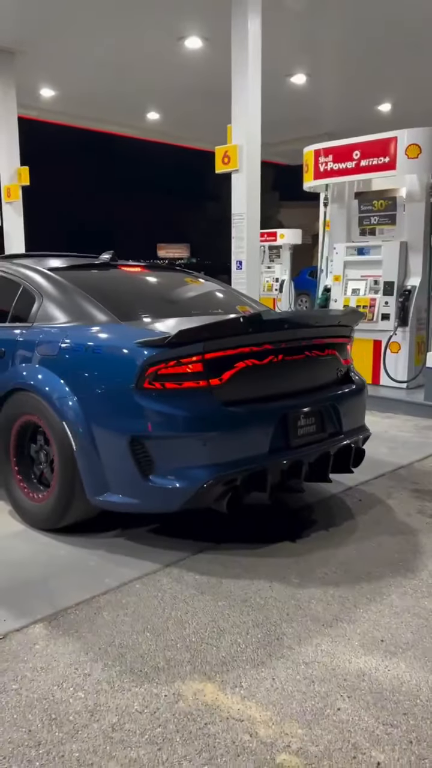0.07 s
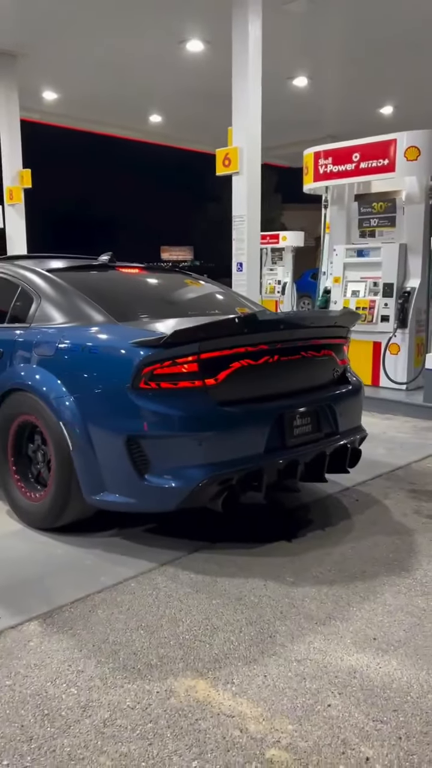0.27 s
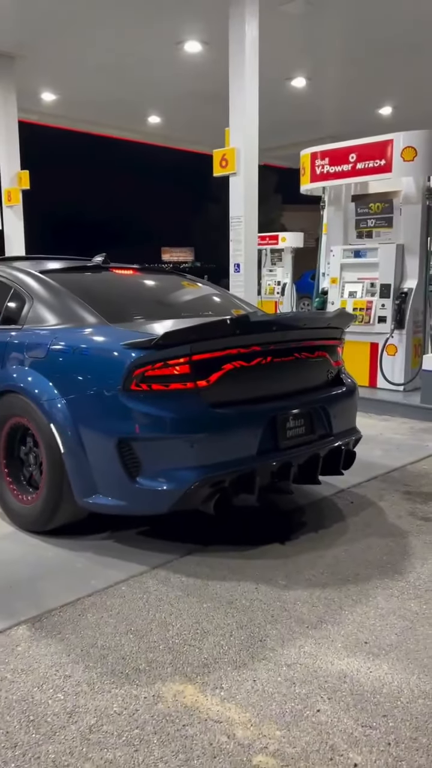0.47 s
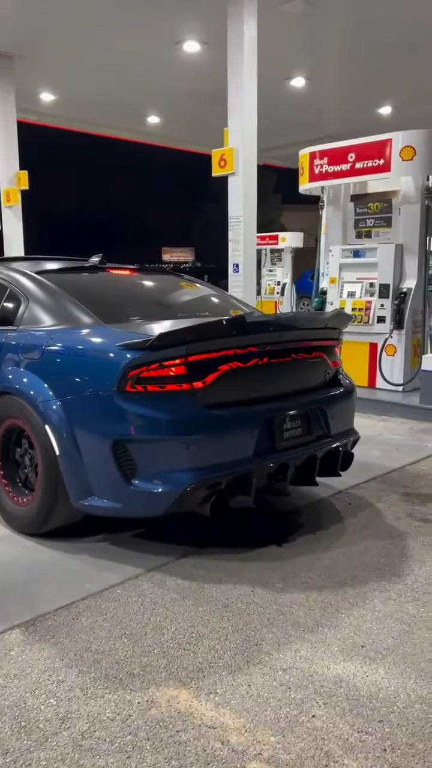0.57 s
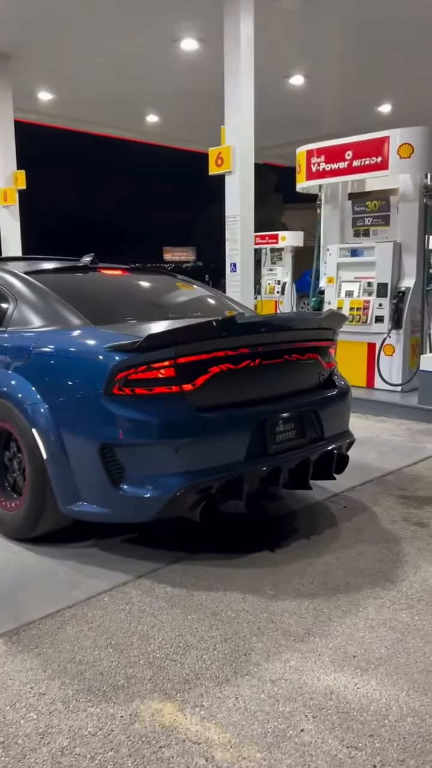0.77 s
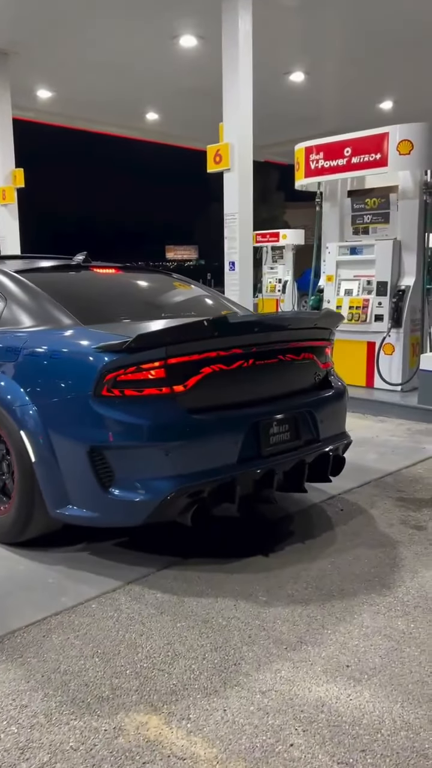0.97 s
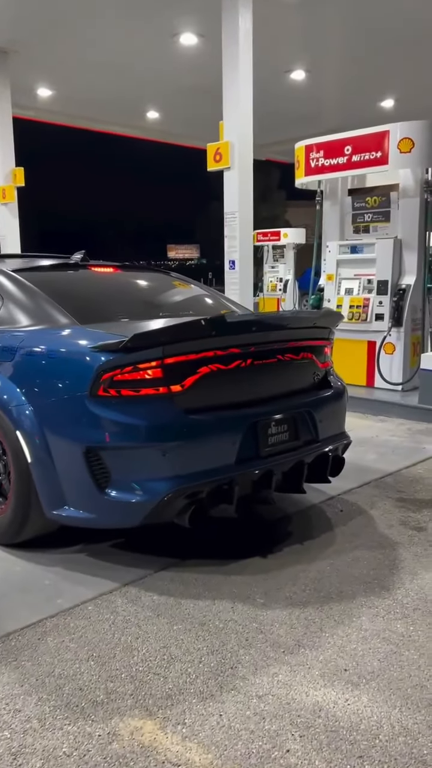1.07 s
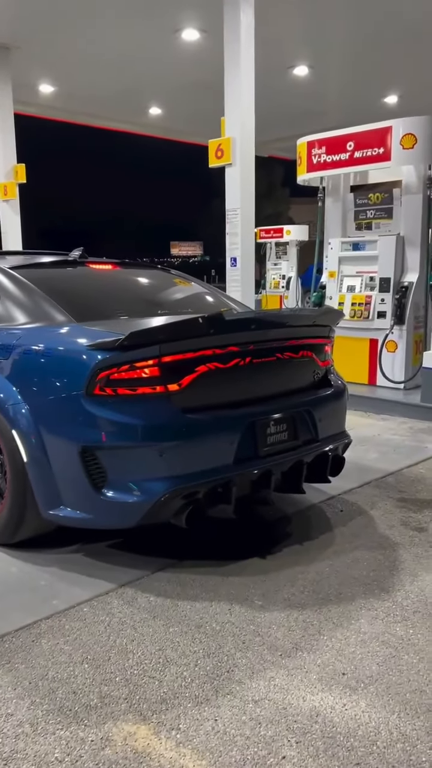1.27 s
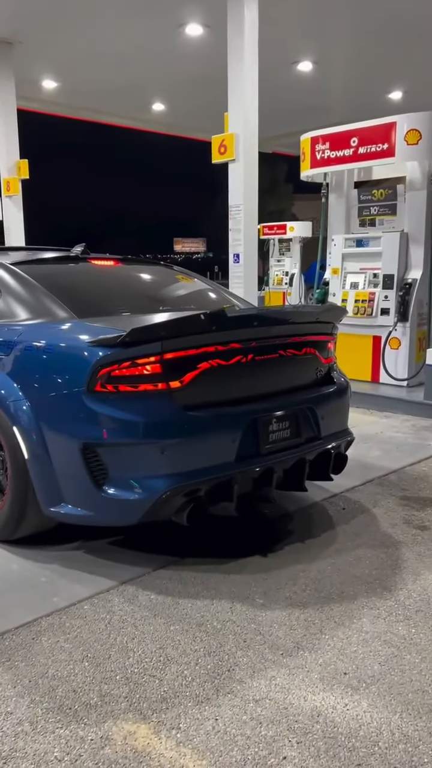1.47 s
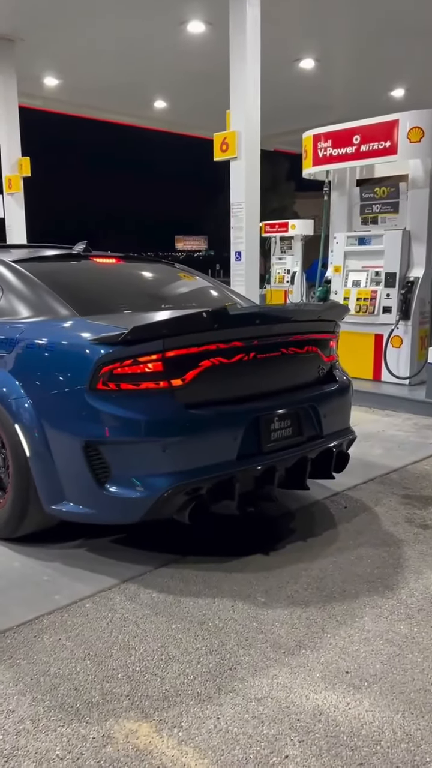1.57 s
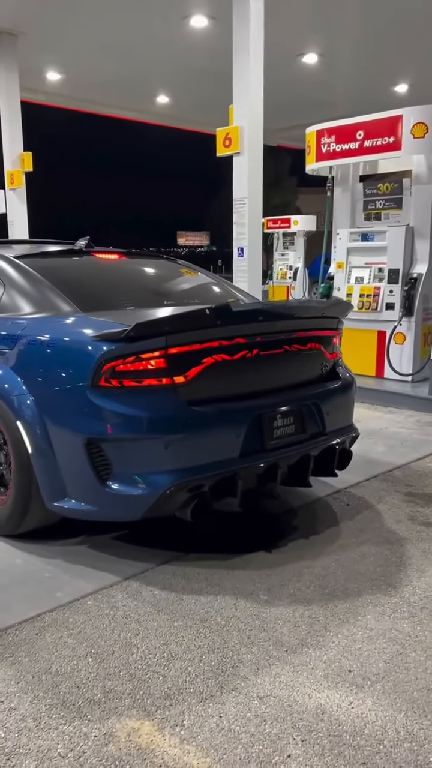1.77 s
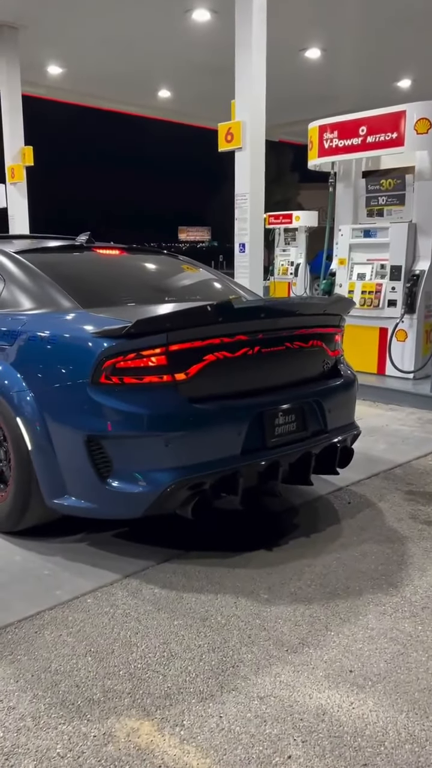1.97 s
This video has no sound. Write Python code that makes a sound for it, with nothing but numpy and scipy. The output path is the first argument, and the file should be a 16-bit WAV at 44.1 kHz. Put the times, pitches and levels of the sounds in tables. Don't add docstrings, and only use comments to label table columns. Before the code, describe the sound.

A V8 car start heard close behind the tailpipe: starter clunks and whines in straining pulses, cylinders bang, the exhaust flares with harsh rasp and crackle, then eases to a lumpy idle under an echoing forecourt roof.

```python
import sys
import numpy as np
from scipy import signal
from scipy.fft import rfft, irfft, next_fast_len
from scipy.io import wavfile
from scipy.ndimage import uniform_filter1d, minimum_filter1d

SR = 44100
rng = np.random.default_rng(int(sys.argv[2]) if len(sys.argv) > 2 else 0)


def waveform_to_disk(signal):
    frames = np.transpose(np.atleast_2d(signal))
    scaled = np.clip(frames, -1, 1) * 32767
    samples = np.round(scaled).astype(np.int16)
    wavfile.write(sys.argv[1], SR, samples)


def voltage_ratio(decibels):
    exponent = np.asarray(decibels, float) / 20
    return 10 ** exponent


N = 88640
T = np.arange(N) / SR
IDLE_FROM_S = 1.43

# (pitch [Hz], level [dB])
JET = [(2500, 7.5), (4000, -5), (6500, -2), (9500, -5.5), (10800, -5), (11600, 4)]
# (pitch [Hz], level [dB per Hz])
GRIND = [(180, -44), (300, -34), (496, -23), (773, -3), (1300, 3), (2580, -16), (3390, -2.5), (9290, -10),
         (11500, -23), (15000, -71), (22000, -120)]
# (pitch [Hz], level [dB per Hz])
NIGHT = [(15, -44), (25, -2), (93, 7), (931, -7.5), (1230, -3.5), (2060, -9.5), (3630, -27.5),
         (9610, -24.5), (11500, -84), (15000, -112), (22000, -120)]


def evened(x):
    return x / np.sqrt(np.mean(x ** 2) + 1e-20)


def shaped(x, points, scale=1):
    f, db = np.transpose(points)
    size = next_fast_len(N + SR // 4)
    hz = np.fft.rfftfreq(size, 1 / SR)
    gain = voltage_ratio(scale * np.interp(np.log(hz + 1), np.log(f + 1), db))
    return irfft(rfft(x, size) * gain, size)[..., :N]


def noise(points):
    below = (points[0][0] / 2, -60)
    above = (points[-1][0] + 400, -90)
    return evened(shaped(rng.standard_normal(N), [below] + list(points) + [above]))


def resonate(x, hz, width):
    turn = np.exp(2j * np.pi * np.cumsum(hz * np.ones(N)) / SR)
    r = np.exp(-np.pi * abs(width) / SR)
    return 2 * (turn * signal.lfilter([1 - r], [1, -r], x / turn)).real


def ring_twice(x, hz, width, widen):
    return evened(resonate(resonate(x, hz, width), hz, widen * width))


def rings(x, table):
    return sum(voltage_ratio(db) * evened(resonate(x, hz, width)) for hz, width, db in table)


def burst(start, rise, hold, t60):
    u = T - start
    return np.clip(u / rise, 0, 1) * voltage_ratio(-60 * np.clip(u - hold, 0, 5 * t60) / t60)


def thump(start, db, hz, t60):
    return voltage_ratio(db) * burst(start, .5 / hz, .5 / hz, t60) * np.sin(2 * np.pi * hz * (T - start))


def patchy(x, depth_db):
    z = signal.stft(x, nperseg=256, noverlap=192)[2]
    field = uniform_filter1d(rng.standard_normal(z.shape), size=7, axis=0)
    field = evened(uniform_filter1d(field, size=18, axis=1))
    return evened(signal.istft(z * voltage_ratio(depth_db * field), nperseg=256, noverlap=192)[1][:N])


def engine():
    # (time [s], firings per second [Hz], firing tone [dB], pipe growl [dB], throttle effort [dB])
    run = [(.895, 63.8, -32, -30, -23.5), (.922, 66.48, -15.5, -22, -58), (.952, 64.1, -5.5, -25, -50),
           (.968, 47.71, -25, -24.5, -36), (.99, 60.09, -17, -13.5, -23.5), (1.04, 61.6, -12, -19, -21.5),
           (1.065, 67.97, -5.5, -23.5, -20.5), (1.09, 74.84, -14, -15.5, -18.5),
           (1.14, 87.36, -10.5, -16.5, -22), (1.2, 97.54, -8, -13.5, -18.5),
           (1.27, 106.6, -8.5, -16.5, -21.5), (1.33, 108.3, -10.5, -14.5, -20.5),
           (1.45, 109.6, -11.5, -13, -26.5), (1.56, 110.5, -15, -19, -33), (1.66, 109.7, -18, -23.5, -42),
           (1.76, 108.3, -49, -22.5, -41), (1.88, 106.6, -18, -28.5, -37), (2.01, 103.9, -18.5, -22, -38)]
    columns = np.transpose(run)
    rate, tone_db, growl_db, effort_db = (np.interp(T, columns[0], c) for c in columns[1:])
    start = run[0][0]
    on = np.clip((T - start) / 0.013 + 1, 0, 1)
    turns = np.cumsum(rate * (T > start)) / SR + 0.2194
    wobble = .05 * np.interp(turns, np.arange(200), rng.standard_normal(200))
    out = firing_tone(turns, rate, tone_db)
    out += pipe_growl(turns + wobble, growl_db)
    out += rasp_and_jet(turns + wobble, rate, effort_db, on)
    return on * out + idle_lumps()


def firing_tone(turns, rate, tone_db):
    # (pitch [Hz], gain [dB])
    overtone_gain = [(120, -7), (190, -8.5), (225, -17.5), (330, -13.5)]
    out = np.sqrt(2) * voltage_ratio(tone_db) * np.cos(2 * np.pi * turns)
    for k in range(2, 4):
        gain_db = np.interp(k * rate, *np.transpose(overtone_gain))
        out += voltage_ratio(tone_db + gain_db) * np.cos(2 * np.pi * k * turns - 0.49 * k)
    return out


def pipe_growl(uneven_turns, growl_db):
    # (pitch [Hz], width [Hz], level [dB])
    pipe_modes = [(227, 36, -6), (252.6, 22, -10.5), (310.5, 26, -0.5), (340.6, 23, 0), (397, 15, -7),
                  (442.5, 17.5, -10)]
    # (pitch [Hz], width [Hz], level [dB])
    low_modes = [(59.9, 6.2, -35), (85, 22, -27.5), (141.3, 9.4, -28), (201, 28, -53)]
    firing = np.maximum.accumulate((uneven_turns + 1).astype(int))
    strength = 1 + np.clip(rng.standard_normal(200), -1.5, 1.5)[firing]
    kicks = evened(np.diff(firing, prepend=firing[0]) * strength)
    kicks = kicks + .5 * rng.standard_normal(N)

    growl = sum(voltage_ratio(db) * ring_twice(kicks, hz, w, 3) for hz, w, db in pipe_modes)
    steady = np.sqrt(uniform_filter1d(growl ** 2, size=2200) + 1e-4)
    low = sum(voltage_ratio(db) * ring_twice(kicks, hz, w, 3) for hz, w, db in low_modes)
    lope = voltage_ratio(7 * np.clip((T - IDLE_FROM_S) / 0.67, 0, 1))
    idle_hiss = voltage_ratio(-40) * evened(resonate(rng.standard_normal(N), 802, 120))
    return voltage_ratio(growl_db) * growl / steady + lope * low + idle_hiss


def rasp_and_jet(uneven_turns, rate, effort_db, on):
    # (pitch [Hz], level [dB per Hz])
    rasp_colour = [(290, -25), (500, 14), (713, -15), (823, -1.5), (1590, 6.5), (4240, -19), (9320, -38),
                   (10600, -57), (11500, -69), (15000, -74), (22000, -120)]
    grain_s, spread_db, bed, spit_width_hz = .003, 1.8, .55, 380
    late = uneven_turns + .55
    index = late.astype(int)
    size_db = np.clip(rng.standard_normal(200), -2, 1.6)[index]
    pitch = rng.random(200)[index]

    grains = np.exp(-(late % 1) / rate / grain_s) * voltage_ratio(spread_db * size_db) * on
    idle_bed = 0.89 * np.clip((T - IDLE_FROM_S) / 0.093, 0, 1)
    gate = evened(evened(grains) + bed + idle_bed)
    rasp = gate * noise(rasp_colour)

    snap = evened(np.maximum(np.diff(gate, prepend=0), 0))
    spit_hz = 972 * 2 ** (pitch ** 2)
    spit = ring_twice(gate * rng.standard_normal(N) + .9 * snap, spit_hz, spit_width_hz, 2)

    full_effort_db = -20
    jet_db = -29 + 0.95 * (effort_db - full_effort_db)
    jet = voltage_ratio(jet_db) * evened(gate + 5.7) * patchy(noise(JET), 3.5)
    return voltage_ratio(effort_db) * (voltage_ratio(-3) * rasp + voltage_ratio(-6.5) * spit) + jet


def idle_lumps():
    # (time [s], level [dB], pitch [Hz])
    lumps = [
        (1.738, -11, 92),
        (1.774, -10, 113.4),
        (1.804, -6.5, 102),
        (1.845, -15, 84.7),
        (1.914, -7, 158),
        (1.958, -20, 107.9),
        (1.989, -14.5, 134),
    ]
    return sum(thump(s, db, hz, 0.065) for s, db, hz in lumps)


def bangs():
    # (time [s], crack level [dB], crack pitch [Hz], hiss level [dB], length [s])
    bang_list = [(0.897, -19, 1710, -25.5, 0.014), (0.925, -20, 900, -20.5, 0.012),
                 (0.926, -18, 1080, -43, 0.0059), (0.926, -21, 1620, -50, .012),
                 (0.927, -24, 2960, -46, 0.016), (0.979, -14.5, 1754, -20, 0.0089),
                 (0.989, -17.5, 1280, -51, 0.011), (1.069, -25, 1130, -49, 0.0355),
                 (1.135, -24, 1250, -32, 0.047), (1.246, -29, 1290, -35, 0.01),
                 (1.608, -33, 2400, -63, 0.0067), (1.907, -35, 850, -39, 0.03),
                 (1.979, -32, 980, -40.5, 0.017)]
    white = rng.standard_normal(N)
    hiss = noise(JET) + 0.43 * noise(GRIND)
    out = np.zeros(N)
    for s, db, hz, hiss_db, length in bang_list:
        crack = resonate(resonate(white, hz, 0.4 * hz), hz, 0.38 * hz)
        crack = evened(resonate(crack, hz, 0.64 * hz))
        crack = crack / np.sqrt(uniform_filter1d(crack ** 2, size=300) + .05)
        out += burst(s, .001, length, .035) * voltage_ratio(db) * crack
        out += burst(s, 0.0077, length, 0.084) * voltage_ratio(hiss_db) * hiss
    return out


def snaps():
    # (time [s], peak level [dB], pitch [Hz])
    pings = [(1.014, -11, 1830), (1.029, -7, 1360), (1.043, -8.5, 1560), (1.066, -13.5, 1180),
             (1.073, -7, 1140), (1.085, -2.5, 1365), (1.092, -14, 1290), (1.107, -15, 1010),
             (1.121, -6, 840), (1.132, -1.5, 973), (1.143, -5, 1160), (1.159, -11, 1180),
             (1.175, -17, 1270), (1.187, -12, 1570), (1.214, -9, 1210), (1.226, -6.5, 1154),
             (1.245, -4, 1250), (1.251, -12, 1130), (1.283, -15.5, 2070), (1.292, -4.5, 1510),
             (1.3, -7.5, 1047), (1.312, -14, 1580), (1.317, -18, 1600), (1.348, -12, 1570),
             (1.366, -11, 980), (1.375, -7.5, 1480), (1.393, -7.5, 1210), (1.403, -16, 1580),
             (1.41, -18, 1176), (1.43, -14.5, 802), (1.44, -17, 1270), (1.447, -7, 1110),
             (1.466, -17, 1300), (1.476, -15, 1600), (1.511, -12.5, 1126), (1.581, -22, 1180),
             (1.591, -16, 1230), (1.612, -20, 1140), (1.989, -22, 850)]
    t60, rise_s = .017, .0012
    t = np.arange(SR // 20) / SR
    out = np.zeros(N + SR)
    for s, db, hz in pings:
        ping = voltage_ratio(-60 * t / t60) * np.sin(2 * np.pi * hz * t)
        edge = voltage_ratio(-4 - 120 * t / t60) * np.sin(2 * np.pi * 1.75 * hz * t)
        rise = np.minimum(t / rise_s, 1) ** 2
        out[round(s * SR):][:len(t)] += voltage_ratio(db + 1.5) * (ping + edge) * rise
    return out[:N]


def gusts():
    # (time [s], length [s], level [dB], pitch [Hz])
    gust_list = [
        (0.995, 0.026, -31.5, 8900),
        (1.04, .015, -42, 6540),
        (1.074, 0.066, -32.5, 8930),
        (1.176, 0.015, -30, 8900),
        (1.18, 0.028, -41, 5860),
        (1.272, 0.015, -42, 8600),
        (1.316, .04, -35.5, 6750),
        (1.348, 0.0056, -41, 9000),
        (1.416, 0.032, -48, 6350),
    ]
    white = rng.standard_normal(N)
    out = np.zeros(N)
    for s, length, db, hz in gust_list:
        lip = ring_twice(white, hz, 1700, 1)
        out += voltage_ratio(db) * lip * burst(s, 0.23 * length, length, 3 * length)
    return out


def starter():
    return pinion_clunk() + gear_strain() + cranking_puffs()


def pinion_clunk():
    # (pitch [Hz], level [dB per Hz])
    clunk_colour = [(180, -41), (300, -21), (835, -10), (1030, -29), (2390, -3), (3300, -14.5), (4340, -11),
                    (7300, -8.5), (11500, -18), (15000, -53), (22000, -120)]
    # (pitch [Hz], width [Hz], level [dB])
    clunk_modes = [(470, 35, -9), (1080, 90, -4), (4470, 120, -11), (5480, 130, -11.5), (7220, 81, -10)]
    # (pitch [Hz], level [dB per Hz])
    spin_colour = [(300, -35), (800, -2.5), (1250, 1), (1800, -6.5), (2500, -1.5), (3100, -5), (4200, -11),
                   (9000, -30.5)]
    start = 0.033
    clank = noise(clunk_colour) + rings(rng.standard_normal(N), clunk_modes)
    out = voltage_ratio(-29) * clank * burst(start, 0.004, 0.023, 0.064)
    out += voltage_ratio(-29 - 15) * noise(clunk_colour) * burst(start, .01, 0.021, .85)
    out += voltage_ratio(-40) * noise(NIGHT) * burst(start, 0.005, 0.426, 0.087)
    return out + voltage_ratio(-37.5) * patchy(noise(spin_colour), 0.83) * burst(0.039, 0.065, 0.18, 1.5)


def gear_strain():
    # (start [s], length [s], level [dB], gear pitch [Hz], sag [share of pitch])
    strokes = [
        (0.355, 0.115, -33.5, 957, 0.23),
        (0.516, 0.068, -31, 1100, 0.25),
        (0.63, 0.055, -32.5, 1171, 0.16),
        (0.713, 0.065, -30.5, 1053, 0.063),
        (0.806, 0.065, -29.5, 1111, 0.077),
    ]
    # (multiple of gear pitch [1], width [Hz], level [dB])
    mesh_tones = [(1, 70, -1), (2, 100, -3), (3, 130, -6)]
    # (pitch [Hz], width [Hz], level [dB])
    casing = [(780, 41, -5), (1770, 220, -9.5), (2460, 310, -3.5)]
    white = rng.standard_normal(N)
    body = evened(voltage_ratio(-4) * noise(GRIND) + rings(rng.standard_normal(N), casing))
    out = np.zeros(N)
    for s, length, db, hz, sag in strokes:
        mesh = hz * (1 - sag * np.clip((T - s) / length, 0, 1) ** 1.7)
        turns = np.cumsum(mesh) / SR
        whine = np.zeros(N)
        for k, width, tone_db in mesh_tones:
            rough = ring_twice(white, k * mesh, width, 2)
            clean = .25 * np.cos(2 * np.pi * k * turns)
            whine += voltage_ratio(tone_db) * (rough + clean)
        whine_db = db - 1 - 14 * (s - strokes[0][0])
        out += voltage_ratio(whine_db) * whine * burst(s, 0.38 * length, 0.84 * length, 1.3 * length)
        out += voltage_ratio(db - 2) * body * burst(s, .25 * length, 0.59 * length, 6.5 * length)
    return out


def cranking_puffs():
    # (time [s], level [dB], pitch [Hz], decay t60 [s])
    puffs = [
        (0.102, -40, 63, 0.13),
        (0.202, -29, 69.6, 0.2),
        (0.393, -32, 60.5, 0.11),
        (0.599, -31, 358, 0.12),
        (0.82, -31.5, 437, 0.14),
        (0.599, -35, 50, 0.52),
        (0.685, -29.5, 58.4, 1),
        (0.78, -28.5, 58.4, 0.17),
        (0.859, -31.5, 60.4, 0.13),
    ]
    # (pitch [Hz], level [dB])
    rumble_colour = [(25, -31), (60, 2), (150, -2.5), (300, -16.5), (600, -13)]
    rumble = voltage_ratio(-38) * noise(rumble_colour) * burst(0.033, 0.023, 0.9, 0.33)
    return sum(thump(*row) for row in puffs) + rumble


def roof_echo(x):
    t60, gap_s = 0.56, 0.011
    t = np.arange(SR // 2) / SR
    taps = rng.standard_normal(len(t)) * voltage_ratio(-60 * t / t60) * (t > gap_s)
    echo = signal.fftconvolve(x, taps / np.linalg.norm(taps))[:N]
    return voltage_ratio(-10) * shaped(echo, [(250, -15), (900, 3.5)])


def scattered(x):
    z = signal.stft(x, nperseg=256, noverlap=192)[2]
    phases = np.exp(2j * np.pi * rng.random(z.shape))
    return 2 * signal.istft(z * phases, nperseg=256, noverlap=192)[1][:N]


def scene():
    # (pitch [Hz], left minus right [dB])
    lean = [(170, 0), (300, .8), (600, 1.7), (1300, 1.9), (2200, -1.2), (4500, .4), (9000, -.2)]
    # (pitch [Hz], level [dB])
    wide = [(170, -93), (300, -99.5), (1300, -11), (1800, -75), (2300, -6), (4500, -2), (9000, -10),
            (11000, -7.5)]
    crank = starter()
    car = engine() + bangs() + snaps() + gusts() + crank
    mid = car + roof_echo(car) + voltage_ratio(-43) * noise(NIGHT)
    starter_left = voltage_ratio(-36) * shaped(crank, [(170, -72), (350, 6), (1800, -6), (2500, -20)])
    side = shaped(scattered(mid), wide) + starter_left
    return np.array([shaped(mid, lean, .5) + side, shaped(mid, lean, -.5) - side])


def top_cut(x):
    return signal.sosfilt(signal.butter(12, 11690, fs=SR, output="sos"), x)


def record(dry):
    # (pitch [Hz], level [dB])
    mic = [(3050, 0), (3420, -5), (3750, 0), (10300, 0), (10800, -9), (11100, -34), (11700, -44)]
    ceiling = .97
    peak = -minimum_filter1d(-abs(dry).max(0), size=61) / ceiling
    turn_down = uniform_filter1d((1 + peak ** 4) ** (-1 / 4), size=41)
    return top_cut(shaped(dry * turn_down, mic))


dry = scene()
out = record(dry)
waveform_to_disk(out)
```